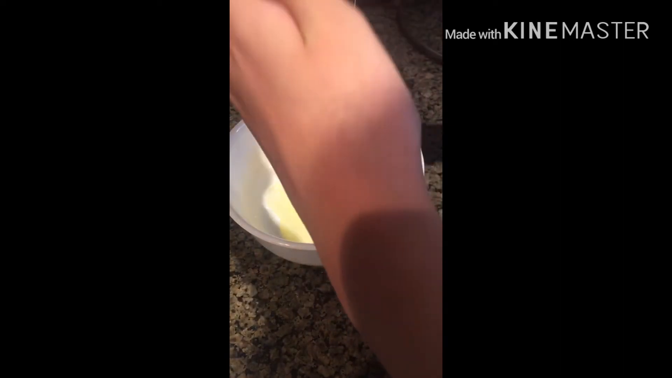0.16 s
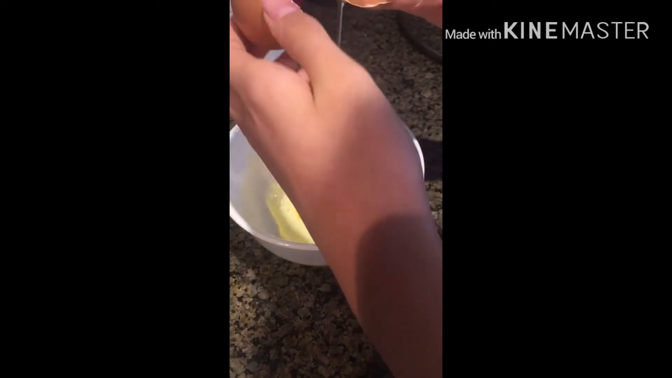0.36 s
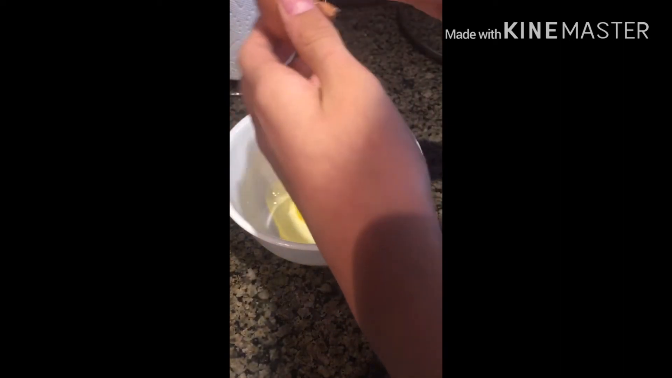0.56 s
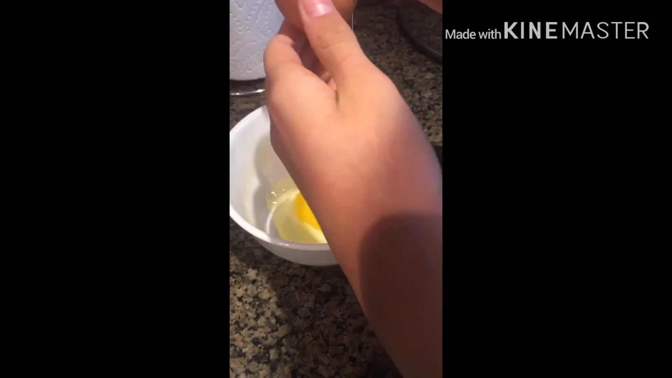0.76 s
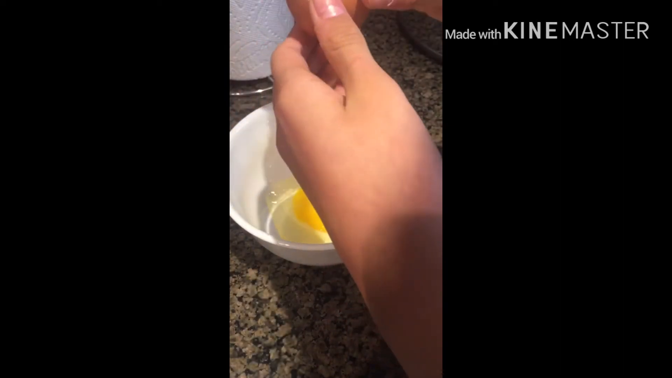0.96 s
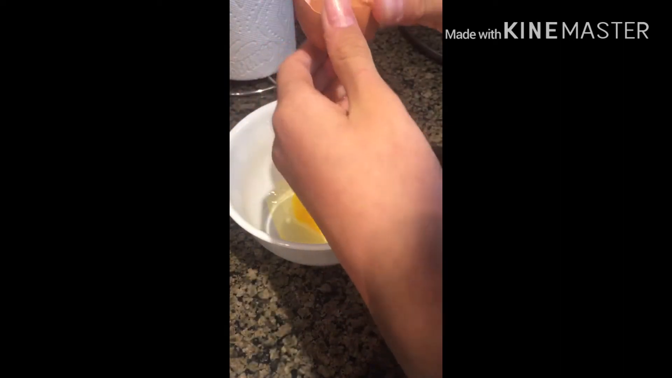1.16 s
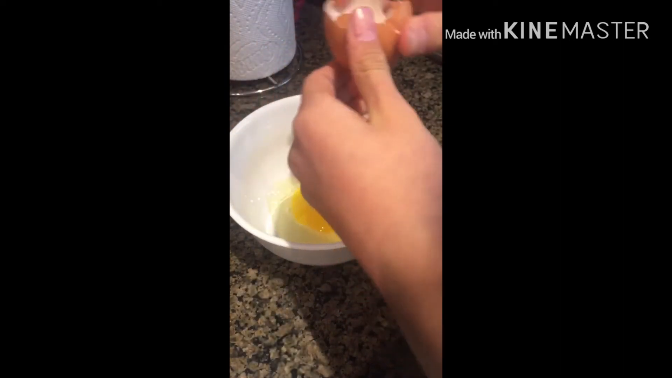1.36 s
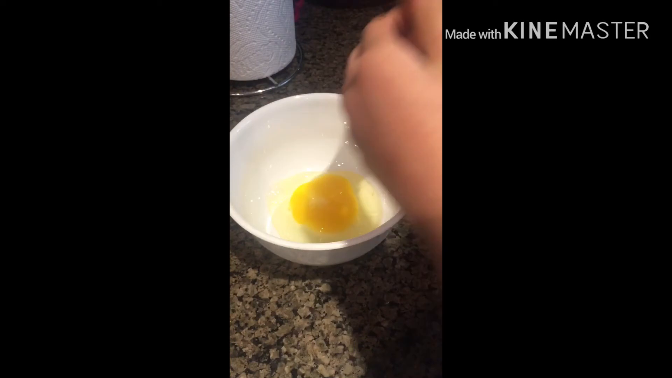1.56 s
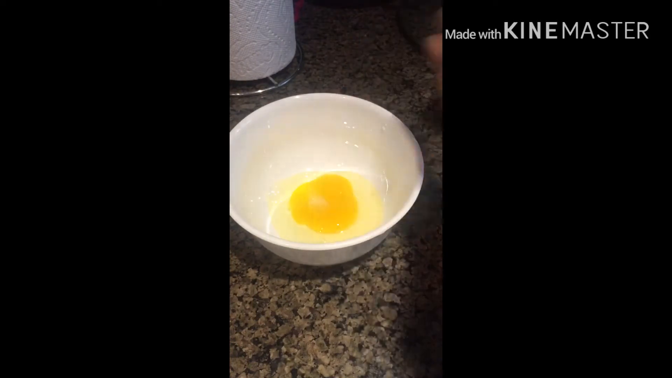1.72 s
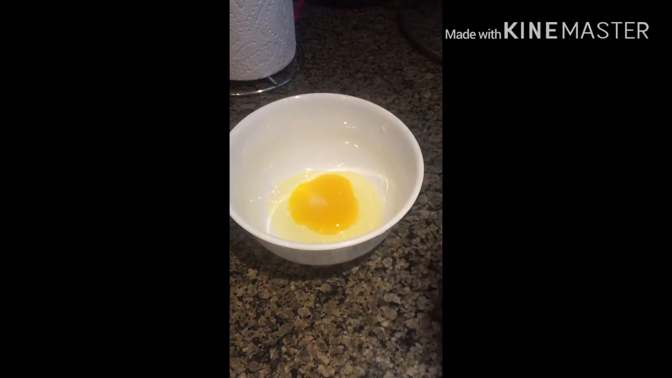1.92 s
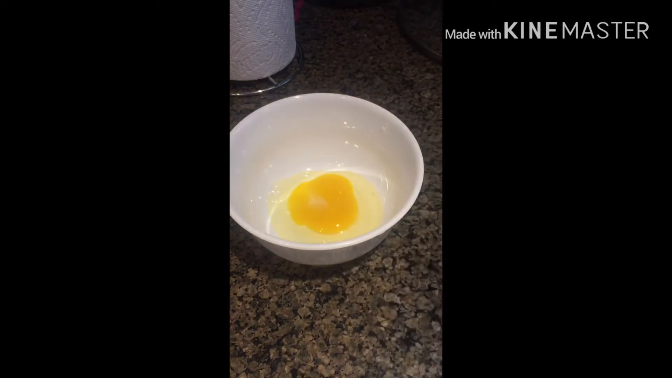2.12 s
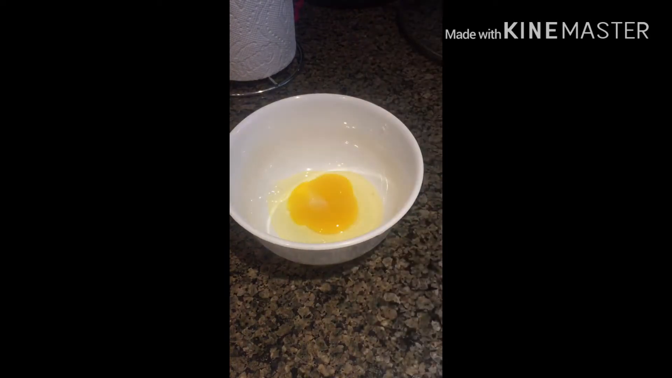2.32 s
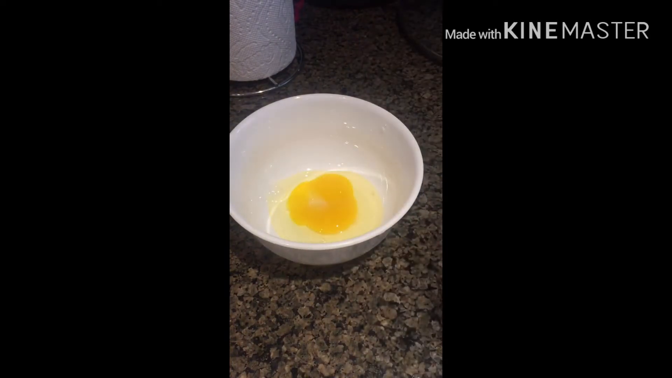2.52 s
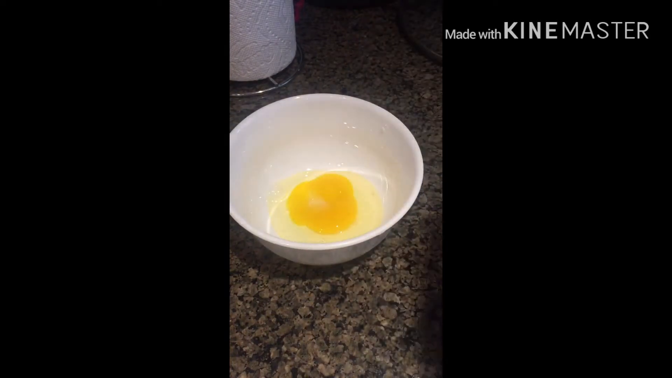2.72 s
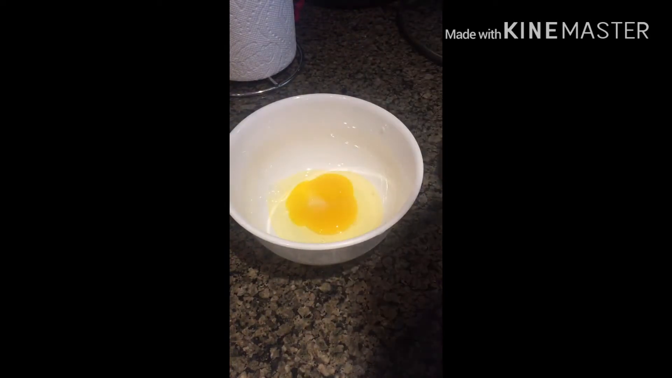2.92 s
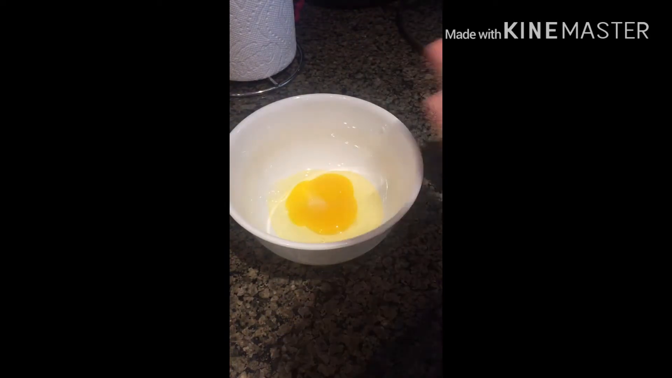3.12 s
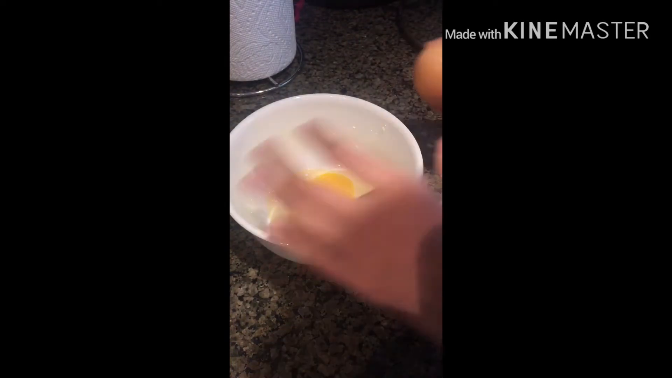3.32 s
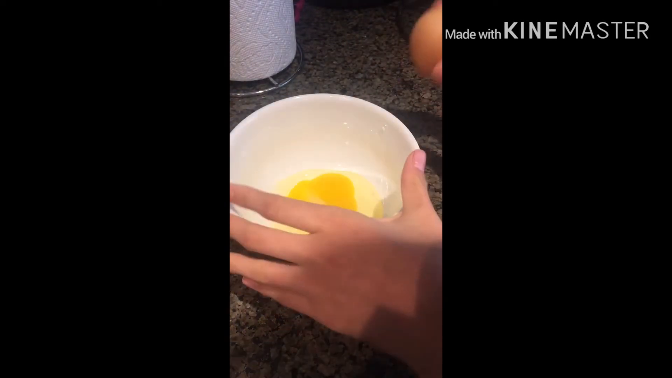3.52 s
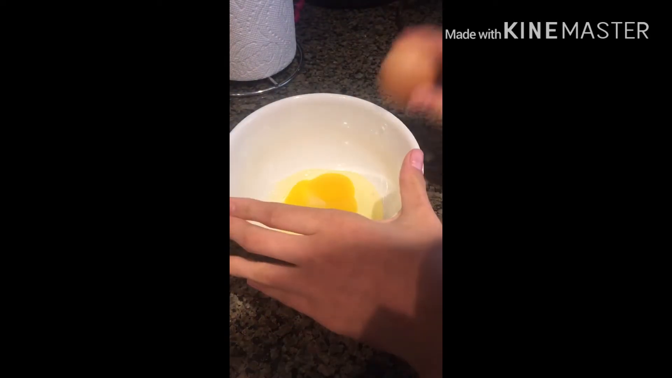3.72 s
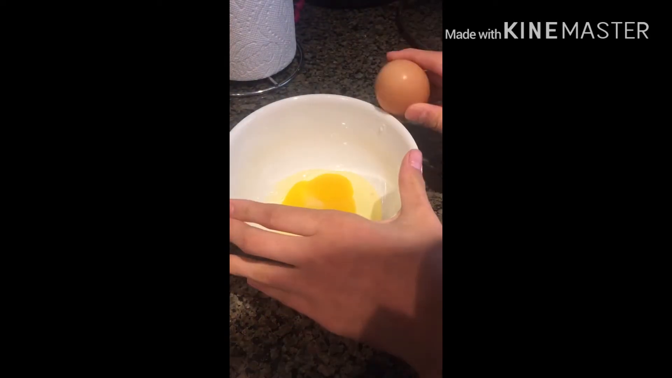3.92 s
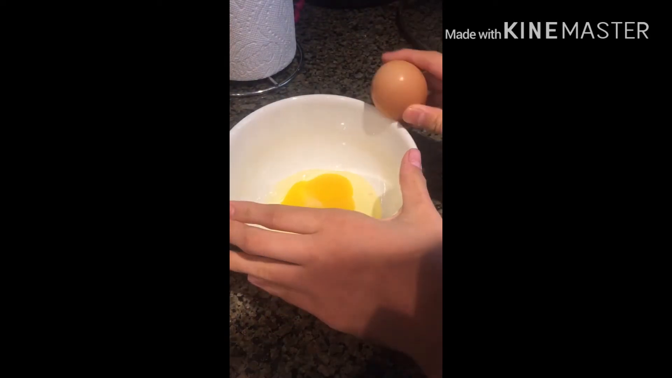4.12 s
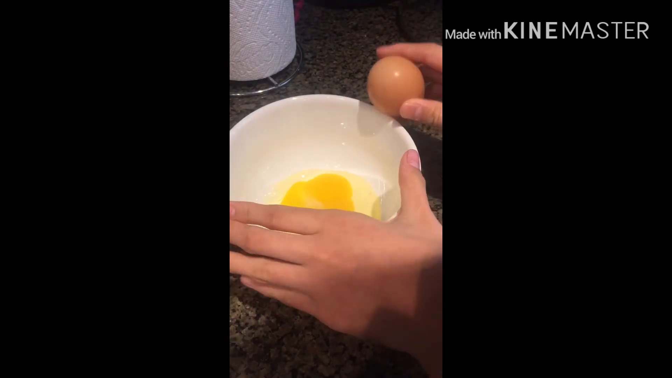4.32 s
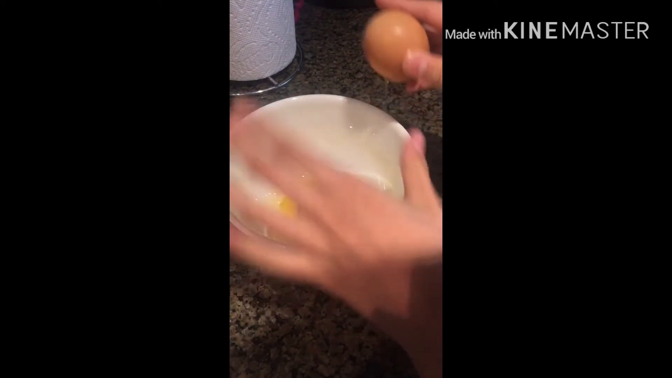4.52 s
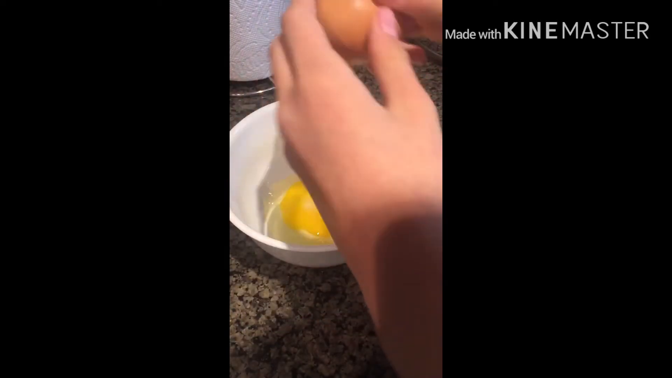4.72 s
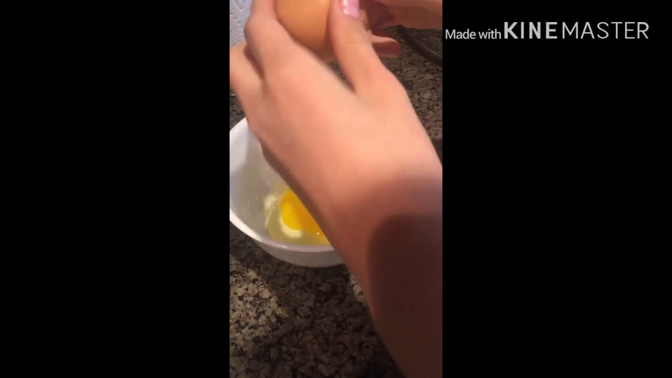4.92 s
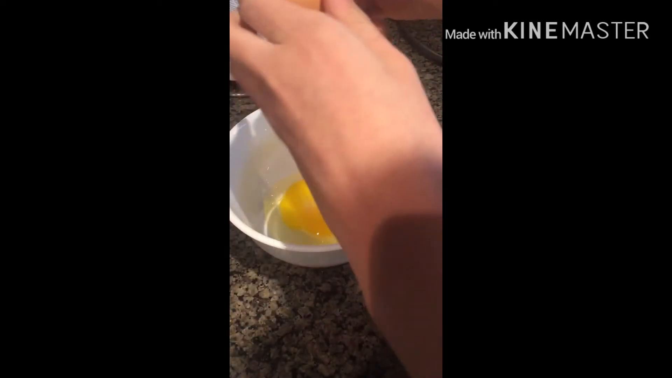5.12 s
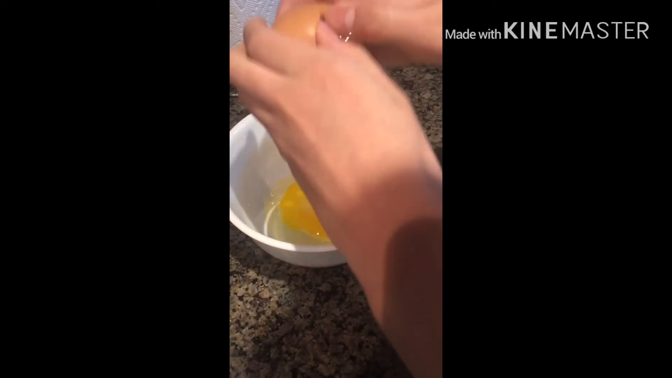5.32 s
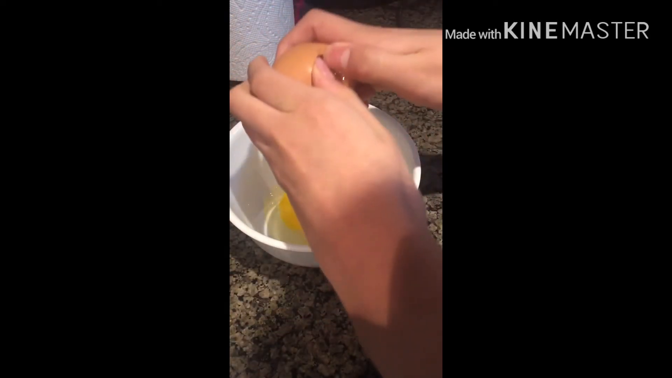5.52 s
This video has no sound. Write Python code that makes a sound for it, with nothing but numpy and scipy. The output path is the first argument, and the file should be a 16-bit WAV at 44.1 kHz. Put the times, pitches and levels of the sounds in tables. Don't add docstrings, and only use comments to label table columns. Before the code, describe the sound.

Close, dry handling of eggs over faint room hum and hiss: tiny ticks and skin rubbing, a dense run of brittle shell cracks growing louder, a pause, a loud rattling landing of the discarded shell, another pause, two firm crunching taps on a hand-damped ceramic bowl, then small duller cracks from the fuller egg. A short tiled-kitchen echo follows the loud hits, and the background dips after them.

```python
import sys
import numpy as np
from scipy import signal
from scipy.fft import rfft, irfft, next_fast_len
from scipy.io import wavfile
from scipy.ndimage import uniform_filter1d, map_coordinates

SR = 44100
rng = np.random.default_rng(int(sys.argv[2]) if len(sys.argv) > 2 else 0)


def gain_from_decibels(decibels):
    exponent = np.asarray(decibels, float) / 20
    return 10 ** exponent


def inscribe(sig):
    pcm = np.round(np.clip(np.atleast_2d(sig).T, -1, 1) * 32767)
    wavfile.write(sys.argv[1], SR, pcm.astype(np.int16))


N = 245637

# [f/Hz, level/dB per Hz]
FULL_WALL = [(500, -39.5), (1100, 1.5), (2500, -4), (5000, -8), (8000, -1.5), (12000, -3), (16000, -7)]


def unit(x):
    return x / np.sqrt(np.mean(x ** 2) + 1e-20)


def along(points, hz):
    f, v = np.transpose(points)
    return np.interp(np.log(hz + 1), np.log(f + 1), v)


def wobble(rate_hz):
    knots = rng.standard_normal(int(N * rate_hz / SR) + 4)
    return map_coordinates(knots, [np.arange(N) * rate_hz / SR])


def coloured(spectrum, size):
    m = next_fast_len(size)
    gain = gain_from_decibels(along(spectrum, np.fft.rfftfreq(m, 1 / SR)))
    return unit(irfft(rfft(rng.standard_normal(m)) * gain, m)[:size])


def resonated(x, hz, width_hz):
    r = np.exp(-np.pi * width_hz / SR)
    y = signal.lfilter([1, 0, -1], [1, -2 * r * np.cos(2 * np.pi * hz / SR), r * r], x)
    return y / np.abs(y).max()


def add(out, s, x):
    part = out[round(s * SR):][:len(x)]
    part += x[:len(part)]


def fractures(rows, shards_hz, dying_s, hollow_hz=None, spread=.1):
    events = []
    chance = rng.random((len(rows), 3))
    for (s, hollow_db, wall_db, *last), (a, b, c) in zip(rows, chance):
        pitch_hz = hollow_hz * (1 + spread * (a - .5)) if hollow_hz else last[0]
        plate_hz = last[1] if last[1:] else shards_hz[int(b * len(shards_hz))]
        plate_hz = plate_hz * (0.9698 + .06 * c)
        fade_s = dying_s * (.8 + 0.29 * c) if dying_s else last[0]
        events.append((s, hollow_db, pitch_hz, wall_db, plate_hz, fade_s))
    return events


def shell(events, wall, hollow_width_hz, wall_width_hz, snap_db, body_db,
          opening=((0, -30, 1, -40),), cup_db=-40):
    upper_hz, cup_hz, shoulder_hz = 3020, 1030, 1790
    out, t = np.zeros(N), np.arange(SR // 8) / SR
    open_s, *open_columns = np.transpose(opening)
    for s, hollow_db, hollow_hz, wall_db, wall_hz, dying_s in events:
        upper_db, factor, shoulder_db = (np.interp(s, open_s, c) for c in open_columns)
        hollow_hz = hollow_hz * factor

        jerks = gain_from_decibels(3.6 * unit(uniform_filter1d(rng.standard_normal(len(t)), size=24)))
        rattle = jerks * gain_from_decibels(-60 * t / max(dying_s, .004))
        snap = gain_from_decibels(snap_db - 60 * t / 0.0089)
        drive = (snap + rattle) * (1 - np.exp(-t / 0.000093))
        knock = drive * rng.standard_normal(len(t))

        hollow = resonated(resonated(knock, hollow_hz, hollow_width_hz), hollow_hz, 6 * hollow_width_hz)
        hollow = hollow + gain_from_decibels(body_db) * resonated(knock, hollow_hz * rng.uniform(.5, .8), 700)
        upper = resonated(knock, upper_hz * rng.uniform(.96, 1.08), 450)
        hollow = hollow + gain_from_decibels(upper_db) * resonated(upper, upper_hz, 800)
        hollow = hollow + gain_from_decibels(cup_db) * resonated(resonated(knock, cup_hz, 350), cup_hz, 500)
        shoulder = resonated(resonated(knock, shoulder_hz, 250), shoulder_hz, 400)
        hollow = hollow + gain_from_decibels(shoulder_db) * shoulder

        crackle = drive * gain_from_decibels(-60 * t / 0.23) * coloured(wall, len(t))
        crackle = crackle / np.abs(crackle).max() + 0.89 * resonated(crackle, wall_hz, wall_width_hz)
        crackle = crackle / np.abs(crackle).max()
        add(out, s, gain_from_decibels(hollow_db - 1.5) * hollow + gain_from_decibels(wall_db - 2) * crackle)
    return out


def tearing(count=10):
    # [start t/s, length/s, hollow peak level/dB, wall peak level/dB, place of peak 0-1]
    tears = [(.704, .045, -28, -42, .4), (.889, .044, -22, -19, .6), (.936, .03, -28, -28, .1),
             (1.107, .036, -22, -22, .15), (1.243, .025, -14, -9, 0), (1.282, .026, -13, -11, .3)]
    edge_db, scatter_db = 29.5, 1.5
    rows = []
    for s, length_s, hollow_db, wall_db, peak in tears:
        u = (np.arange(count) + .8 * rng.random(count)) / count
        db = scatter_db * rng.standard_normal((2, count)) - edge_db * (u - peak) ** 2
        rows += zip(s + length_s * u, hollow_db + db[0], wall_db + db[1])
    return rows


def pry_shell():
    # [t/s, hollow peak level/dB, wall peak level/dB]
    tick_rows = [(.0305, -48.5, -37.5), (.1045, -45.5, -48), (.133, -28, -32), (.1615, -40, -19),
                 (.2765, -41.5, -48), (.2585, -50, -44), (.318, -38, -34), (.3405, -55.5, -35),
                 (.3845, -40, -34), (.4155, -53.5, -41.5), (.4295, -42, -38), (.5705, -53.5, -44),
                 (.6225, -30.5, -28.5), (.6295, -32, -30), (.8285, -44, -40), (.8405, -34.5, -41),
                 (.8655, -32, -37), (.8845, -38, -36), (1.0445, -33, -34), (1.2225, -26, -28),
                 (1.2345, -33, -31), (1.3235, -22.5, -31), (1.3775, -48.5, -24.5), (1.5075, -36, -31.5),
                 (1.7705, -60, -50), (1.8995, -61, -49), (2.2965, -50, -52)]
    # [t/s, hollow peak level/dB, wall peak level/dB, dying/s, plate f/Hz]
    snap_rows = [(.601, -16, -20, .05, 6140), (.649, -12, -15, .035, 5700), (.6605, -16, -33, .06, 6200),
                 (.668, -14.5, -33, .06, 6170), (.6935, -24, -27, .07, 7900), (.7055, -27, -36, .03, 6000),
                 (.7105, -21, -32, .05, 5680), (.7185, -20, -31, .04, 5670), (.7265, -21, -28, .04, 5700),
                 (.7365, -20, -35, .045, 5700), (.7762, -20, -26, .06, 6890), (.8922, -29, -31, .04, 5220),
                 (.8985, -23, -22, .04, 5730), (.9053, -10, -10, .02, 6900), (.9092, -13, -11, .03, 6900),
                 (.9125, -13, -12, .03, 6900), (.9175, -10, -13, .03, 6200), (.923, -14, -17, .035, 5900),
                 (.9275, -17, -16, .04, 5700), (.9385, -14, -22, .03, 5700), (.9475, -24, -24, .05, 5900),
                 (.964, -27, -36, .09, 5700), (.985, -31, -38, .09, 8000), (1.0688, -14, -15, .035, 6720),
                 (1.0857, -10, -15, .035, 5440), (1.103, -19, -23.5, .04, 5500),
                 (1.108, -12, -18, .09, 7350), (1.1255, -24, -20, .03, 4500), (1.1346, -9, -12, .025, 6700),
                 (1.162, -23, -24, .05, 8510), (1.187, -16, -21, .035, 7950), (1.2012, -13, -21, .04, 7910),
                 (1.2425, -11, -4, .04, 8100), (1.2475, -4, -3, .025, 5420), (1.2575, -9, -14.5, .05, 5500),
                 (1.2675, -17, -27, .036, 5500), (1.2815, -12, -10, .05, 8200),
                 (1.287, -1, -2.5, .035, 8970), (1.2905, -5, -5, .04, 6480), (1.296, -6, -4, .035, 5600),
                 (1.3137, -2, -8, .03, 6090)]
    # [t/s, second air mode level/dB, hollow pitch factor, larger half level/dB]
    halves = [(.6, -2, 1.07, -17), (.65, -12, .98, -9), (.74, -7, .99, -7), (.78, -3, 1.04, -10),
              (.88, -5, 1.08, -8), (.925, -6, 1.1, -9), (.94, -9, 1.03, -11), (1.07, -12, 1.01, -12),
              (1.085, -21, .98, -13), (1.13, -15, .97, -14), (1.165, -8, 1, -11), (1.19, -18, .99, -22),
              (1.21, -24, 1, -17), (1.25, -11, .99, -12), (1.28, -5, 1.05, -12), (1.3, -3, 1.09, -10),
              (1.315, -7, 1.06, -10)]
    # [f/Hz, level/dB per Hz]
    thin_wall = [(700, -42), (1050, -18), (2700, -10), (4300, -23), (5500, -5), (9000, -5), (12000, -8),
                 (16000, -12)]
    tick_plates_hz = [7000, 9300, 6200]
    open_plates_hz = [5600, 5800, 6850, 8200]
    hollow_hz = 2170
    ticks = fractures(tick_rows, tick_plates_hz, .036, 2400, spread=.3)
    ticks = shell(ticks, thin_wall, hollow_width_hz=800, wall_width_hz=1500, snap_db=4, body_db=-12)
    cracks = fractures(snap_rows, open_plates_hz, None, hollow_hz, spread=.07)
    cracks = cracks + fractures(tearing(), open_plates_hz, .045, hollow_hz, spread=.16)
    return ticks + shell(cracks, thin_wall, hollow_width_hz=280, wall_width_hz=500, snap_db=4, body_db=-24,
                         opening=halves, cup_db=-18)


def toss_shell():
    # [t/s, hollow peak level/dB, wall peak level/dB, hollow f/Hz]
    impacts = [(2.4258, 3, -7, 2150), (2.4285, .5, -4, 2550), (2.4325, -7, -11, 2200),
               (2.4375, -12, -10, 3500), (2.4445, -14, -16, 2090), (2.4615, -7, -18, 1600),
               (2.4655, -3.5, -9, 1880), (2.471, -1, -11, 2500), (2.4765, 0.6, -13, 1900),
               (2.4835, -11, -18, 1600), (2.4905, -14.5, -20, 2100)]
    # [f/Hz, level/dB per Hz]
    empty_wall = [(600, -31.5), (1700, -7.5), (3450, 3.5), (4500, -12), (5550, -3.5), (7500, 0),
                  (16000, -9)]
    plates_hz = [5600, 5400, 5750]
    return shell(fractures(impacts, plates_hz, .045), empty_wall, hollow_width_hz=631, wall_width_hz=640,
                 snap_db=3, body_db=-8.0)


def tap_egg():
    # [t/s, hollow peak level/dB, wall peak level/dB, hollow f/Hz]
    crunch = [(3.7275, -46, -41, 1470), (3.7517, -3, -3, 1730), (3.7535, -12, -9, 3200),
              (3.7585, -12, -16, 1100), (3.7655, -20, -19, 1380), (4.111, -4, -3.5, 1550),
              (4.1125, -9, -7, 9900), (4.116, -9, -5, 1500), (4.1205, -13.5, -13, 870),
              (4.1275, -27, -16, 847), (4.3113, -52, -48, 5820), (4.3312, -46, -43, 4500),
              (3.7415, -42, -48, 1500)]
    plates_hz = [5939, 5600, 6050]
    return shell(fractures(crunch, plates_hz, 0.0405), FULL_WALL, hollow_width_hz=345, wall_width_hz=440,
                 snap_db=-1.8, body_db=-19)


def bowl():
    # [t/s, spot on rim 0-1, extra level before damping/dB, strength/dB]
    blows = [
        (3.752, .1, 24, 0),
        (4.111, .95, 29, -1),
        (4.311, .6, 9, -24),
        (4.331, 1, 12, -18),
    ]
    # [f/Hz, level from one spot/dB, level from the other/dB, t60/s]
    modes = [(870, -49, -38, .4), (1390, -30, -44, .44), (2535, -62, -46, .7), (2587, -45, -42, .55),
             (4075, -38, -42, .45), (5815, -45, -52, .42), (5930, -54, -52, .4), (6600, -57, -59, .3),
             (7880, -60, -56, .3), (9950, -58, -61, .35), (10080, -62, -58, .45), (11090, -55, -53, .42),
             (12500, -60, -56, .35), (12870, -57, -55, .25)]
    out, t = np.zeros(N), np.arange(SR * 3 // 4) / SR
    for s, spot, early_db, db in blows:
        for hz, one_db, other_db, t60_s in modes:
            beat = 1 + .5 * np.sin(2 * np.pi * (rng.uniform(8, 24) * t + rng.random()))
            dying = beat * gain_from_decibels(-60 * t / t60_s) + gain_from_decibels(early_db - 60 * t / 0.039)
            gain = gain_from_decibels(db + one_db + spot * (other_db - one_db))
            drift = .012 * np.cumsum(rng.standard_normal(len(t)))
            tone = np.sin(2 * np.pi * hz * t + drift) * (1 - np.exp(-t / 0.0017))
            add(out, s, gain * dying * tone)
    return out


def split_egg():
    # [t/s, hollow peak level/dB, wall peak level/dB, hollow f/Hz]
    cracks = [(5.0605, -52.5, -28, 1870), (5.1125, -32, -36, 3900), (5.1255, -41.5, -16, 4310),
              (5.1285, -21, -19, 3800), (5.1565, -43, -39, 1920), (5.1775, -31, -32, 3350),
              (5.193, -20.5, -15.5, 1095), (5.202, -14, -3, 3306), (5.2055, -17, -12, 3890),
              (5.2115, -31, -11, 3980), (5.2215, -11.5, -7, 3307), (5.2275, -29, -16.5, 2920),
              (5.3665, -43.5, -45.5, 3840), (5.3915, -43.5, -42.5, 3750), (5.3985, -39.5, -34, 3597),
              (5.4075, -44, -35, 4000), (5.42, -27, -27, 4040), (5.4235, -36.5, -25, 4350),
              (5.4375, -39, -40.5, 3730), (5.4815, -50.5, -37.5, 1270), (5.4985, -50.5, -39.5, 1057),
              (5.5655, -54.5, -38.5, 4390)]
    plates_hz = [6500, 6650, 8200]
    return shell(fractures(cracks, plates_hz, .038), FULL_WALL, hollow_width_hz=800, wall_width_hz=780,
                 snap_db=-0.83, body_db=-8)


def fingers():
    # [peak t/s, level/dB, rise over 20 dB/s, fall over 20 dB/s]
    strokes = [(.07, -57, .05, .1), (.2, -52, 0.136, 0.27), (1.2, -50.5, 0.28, 0.04),
               (1.62, -58, 0.055, 0.01), (5.065, -48, 0.0418, 0.33), (5.25, -48, 0.114, 0.0471),
               (5.43, -51.5, .07, 0.0048), (5.482, -52, .012, .5)]
    # [f/Hz, level/dB per Hz]
    skin = [(800, -25), (2500, -10), (5200, -12), (6700, -5), (7800, -10), (9300, -6), (11000, -14),
            (16000, -18)]
    t = np.arange(N) / SR
    pressure = np.zeros(N)
    for s, db, rise_s, fall_s in strokes:
        pressure += gain_from_decibels(db - 20 * np.maximum((s - t) / rise_s, (t - s) / fall_s))
    return pressure * unit(gain_from_decibels(2.8 * wobble(160)) * coloured(skin, N))


def clinks():
    # [t/s, f/Hz, level/dB, t60/s]
    touches = [(.389, 1360, -42, .09), (.39, 1340, -56, .45), (.390, 2690, -29, .055),
               (.317, 2600, -50, .08), (.317, 3250, -46, .04), (.162, 2950, -44, .05),
               (.133, 3600, -38, .03), (.133, 2150, -37, .05), (1.77, 2150, -40, .025),
               (1.77, 2450, -42, .025), (1.77, 1750, -45, .025), (4.3, 2587, -53, .12),
               (.39, 2700, -52, .45), (.389, 2570, -44, .1), (3.445, 5830, -62, .3), (3.46, 7880, -66, .2),
               (3.445, 12500, -68, .15), (3.445, 10050, -69, .15), (3.49, 4075, -68, .3),
               (3.5, 2585, -64, .2), (3.535, 2585, -54, .2), (3.54, 5830, -68, .2), (4.33, 9980, -58, .05),
               (4.311, 5850, -56, .08), (4.402, 10050, -62, .12), (5.104, 2600, -53, .04),
               (5.108, 4075, -48, .04)]
    out, t = np.zeros(N), np.arange(SR // 2) / SR
    for s, hz, db, t60_s in touches:
        waver = np.cumsum(rng.standard_normal(len(t))) * .045
        tone = np.sin(2 * np.pi * hz * t + waver) * (1 - np.exp(-t / 0.00067))
        add(out, s, gain_from_decibels(db - 60 * t / t60_s) * tone)
    return out


def counter():
    # [t/s, peak level/dB, f/Hz, width/Hz, dying/s]
    thumps = [(.188, -31, 950, 600, 0.4), (.193, -35, 300, 80, 0.12), (.19, -45, 3500, 2000, .2),
              (.390, -39, 2300, 1500, .25), (.390, -39, 1350, 250, .35), (2.427, -8, 3450, 400, .07),
              (2.47, -28, 3500, 280, .7), (2.47, -31, 5650, 500, .55), (2.46, -30, 12000, 4000, .28),
              (1.833, -38, 1027, 330, 0.192), (1.835, -44.5, 557, 200, 0.266),
              (2.448, -17, 369, 201.7, 0.105), (2.466, -19.5, 282.5, 150.9, 0.132),
              (2.465, -30, 94.9, 25, 0.2), (2.468, -36, 150.7, 30, 0.137), (3.08, -37, 90, 30.5, .2),
              (3.8, -42, 85, 40, 0.3), (3.753, -12, 850, 400, .05), (3.765, -37, 700, 200, .4),
              (3.76, -36, 4100, 900, .2), (3.76, -33, 5300, 900, .25), (4.12, -30, 1350, 300, .3),
              (3.755, -28.5, 214.5, 121.1, 0.092), (4.14, -38, 75, 40, 0.3),
              (4.116, -22.5, 227, 119, 0.0724), (4.112, -24.5, 436, 120, 0.075),
              (5.196, -31, 340, 200, .06), (5.217, -34, 350, 250, .05), (4.14, -41, 880, 160, .3),
              (4.3, -51, 1400, 150, .4), (3.756, -25, 1000, 400, .2), (2.47, -31, 4400, 700, .5),
              (2.47, -29, 1650, 300, .45), (4.13, -38, 420, 150, .2), (2.48, -27, 2350, 500, .8),
              (2.5, -37, 330, 100, .2), (2.49, -41, 1000, 500, .7), (5.47, -44, 1200, 400, .1),
              (5.485, -41, 850, 450, .9), (5.53, -42, 450, 400, .9), (5.385, -44, 1300, 800, .12),
              (5.23, -41, 600, 700, .6)]
    out, t = np.zeros(N), np.arange(SR // 2) / SR
    for s, db, hz, width_hz, dying_s in thumps:
        push = gain_from_decibels(-60 * t / dying_s) * (1 - np.exp(-t / 0.0021)) * rng.standard_normal(len(t))
        knock = resonated(push, hz, 1.4 * width_hz)
        add(out, s, gain_from_decibels(db) * resonated(knock, hz, 1.4 * width_hz))
    return out


def worktop():
    # [t/s, f/Hz, level/dB, t60/s]
    booms = [(2.458, 96, -21, .33), (2.458, 122, -24, .12), (2.44, 45, -33, .5), (2.44, 62, -37, .5),
             (3.757, 90, -26, .26), (3.8, 72, -40, .5), (4.116, 82, -24, .11), (4.113, 112, -38, .4),
             (2.424, 260, -21, .05), (2.462, 175, -24, .1), (3.746, 170, -31, .08), (4.108, 215, -20, .11),
             (4.11, 440, -24, .06), (3.75, 480, -29, .05), (5.197, 320, -36, .15)]
    out, t = np.zeros(N), np.arange(SR // 2) / SR
    for s, hz, db, t60_s in booms:
        add(out, s, gain_from_decibels(db - 60 * t / t60_s) * np.sin(2 * np.pi * hz * t) * (1 - np.exp(-t / .006)))
    return out


def kitchen(x):
    # [f/Hz, t60/s]
    decay = [(100, 0.27), (1000, 0.68), (2400, 0.5715), (4000, 0.64), (6500, .5), (9000, .38), (13000, .32)]
    out, step = np.zeros(N), SR // 4
    for start in range(0, N, step):
        hz, t, z = signal.stft(rng.standard_normal(SR * 3 // 4), SR, nperseg=256)
        fade = gain_from_decibels(-60 * t / along(decay, hz)[:, None])
        tail = signal.istft(z * fade, SR, nperseg=256)[1]
        tail = tail / np.linalg.norm(tail)
        add(out, start / SR + .006, signal.fftconvolve(x[start:start + step], tail))
    return out


def room_tone():
    # [f/Hz, level/dB per Hz]
    rumble_spectrum = [(12, -45), (22, -22), (43, -3.5), (59, 3), (81, -2.5), (140, -2), (183, 2.5),
                       (248, -10), (369, -4), (484, -18), (549, -16), (767, -30), (900, -21), (1170, -48.5),
                       (1980, -120)]
    hiss_spectrum = [(290, -34.5), (500, -12.5), (579, -8), (980, -8), (1200, -6), (1590, -8.5),
                     (1710, -9.5), (4900, -16.5), (15100, -25), (15800, -23), (16500, -45)]
    # [t/s, gain/dB]
    gain_points = [(0, -1), (.5, 0), (2.55, 1.5), (3.05, -2), (3.3, -1.5), (3.74, 0), (3.9, -7.5),
                   (4.9, -5.5), (5.2, -3), (5.57, -3.5)]
    gain_db = np.interp(np.arange(N) / SR, *np.transpose(gain_points))
    rumble = unit(gain_from_decibels(1.2 * wobble(25) + .8 * wobble(4)) * coloured(rumble_spectrum, N))
    hiss_db = -57 + .9 * gain_db + 0.46 * wobble(8.6)
    return gain_from_decibels(-47.5 + gain_db) * rumble + gain_from_decibels(hiss_db) * coloured(hiss_spectrum, N)


def scene():
    prying, toss, taps, splitting = pry_shell(), toss_shell(), tap_egg(), split_egg()
    ring, knocks, clink = bowl(), counter(), clinks()
    wet = gain_from_decibels(-21.5) * prying + gain_from_decibels(-26.0) * splitting + gain_from_decibels(-20.5) * taps + gain_from_decibels(-16) * toss
    wet = wet + gain_from_decibels(-15.5) * knocks + gain_from_decibels(-23) * ring + gain_from_decibels(-7) * clink
    close = prying + splitting + taps + ring + toss + knocks + worktop() + clink + fingers()
    return (close + kitchen(wet) + room_tone())[None]


def band_limit(x):
    return signal.sosfilt(signal.butter(12, 16980, fs=SR, output="sos"), x)


def record(dry):
    top_hz, cut_hz = 15800, 16980
    x = dry / (1 + np.abs(dry / .98) ** 6) ** (1 / 6)
    m = next_fast_len(N)
    hz = np.fft.rfftfreq(m, 1 / SR)
    over_hz = hz - top_hz
    top = gain_from_decibels(-24 * np.clip(over_hz / 250, 0, 1) - 12 * np.clip(over_hz / 1000, 0, 1)) * (hz < cut_hz)
    mix = irfft(rfft(x, m) * top, m)[:, :N]
    return band_limit(mix)


dry = scene()
out = record(dry)
inscribe(out)
```